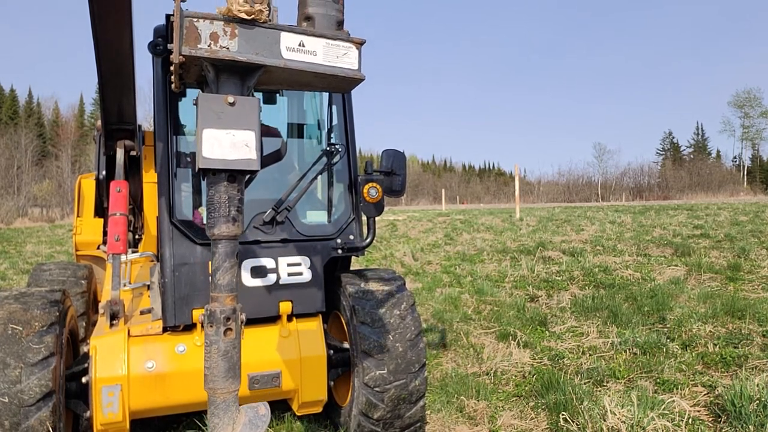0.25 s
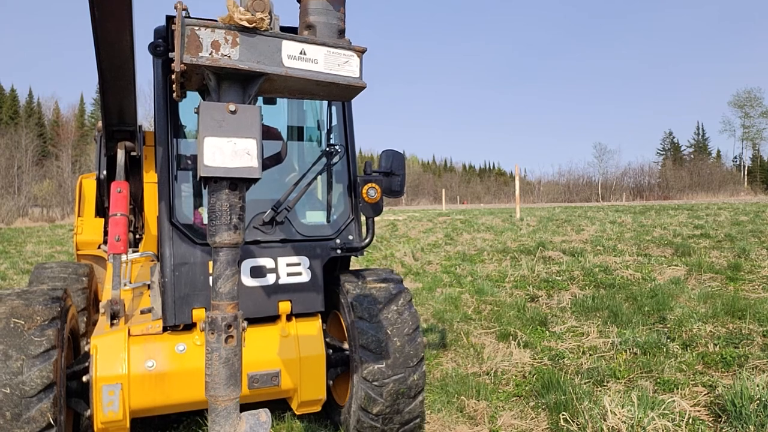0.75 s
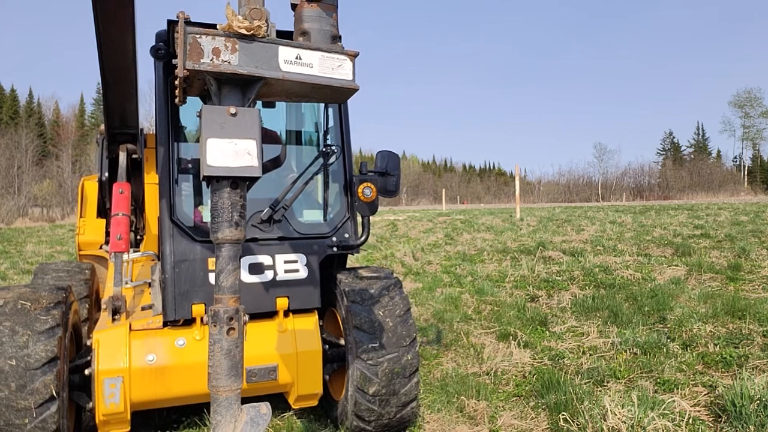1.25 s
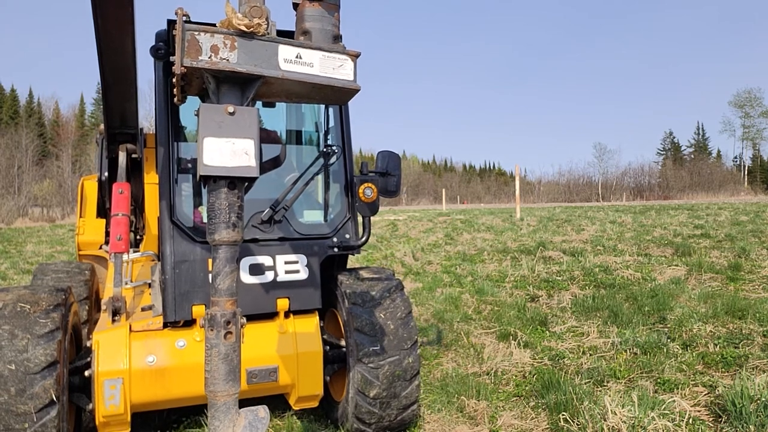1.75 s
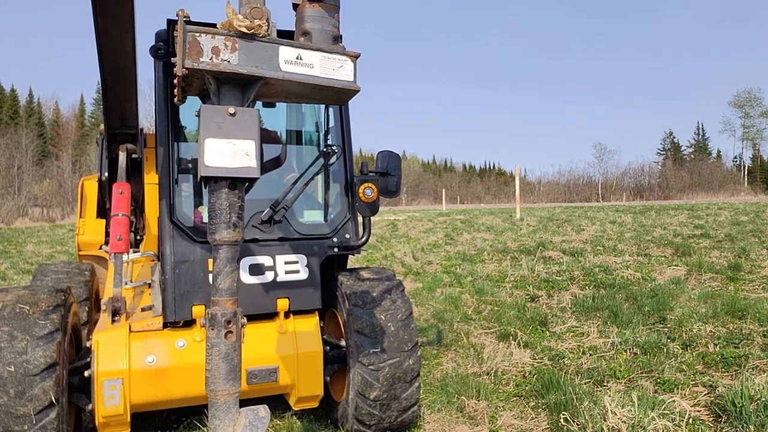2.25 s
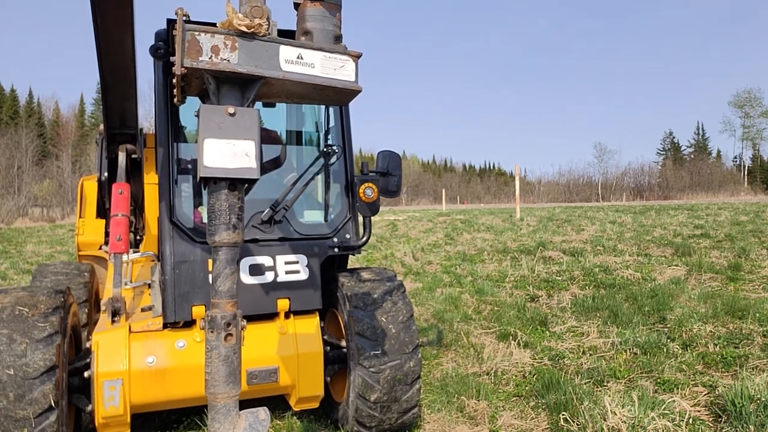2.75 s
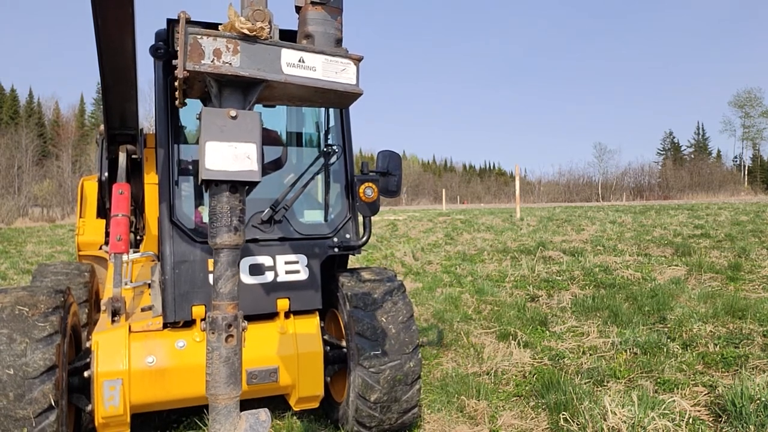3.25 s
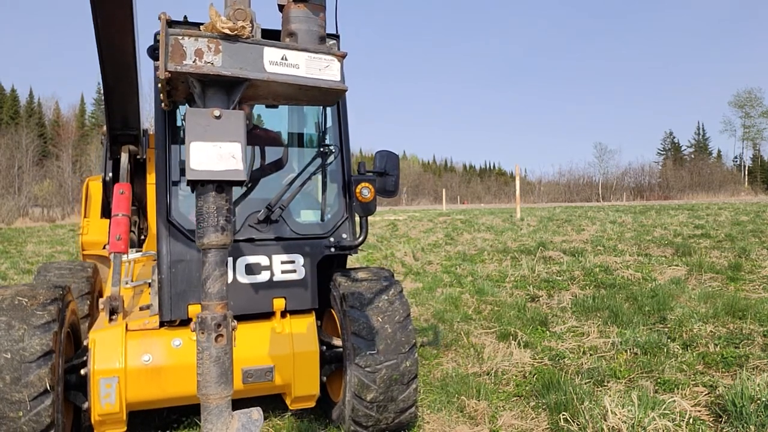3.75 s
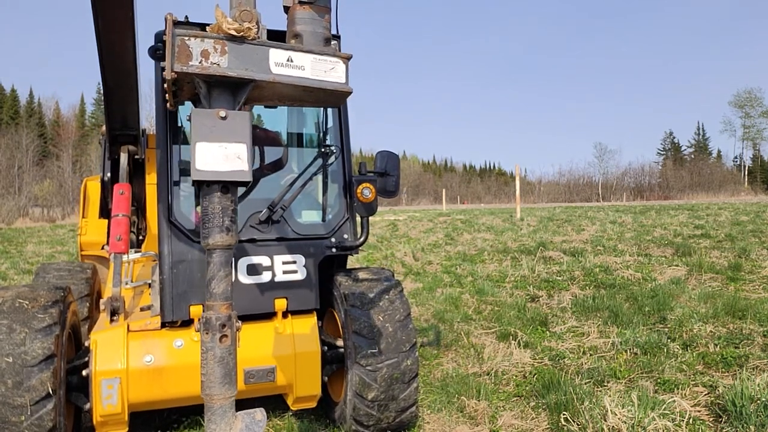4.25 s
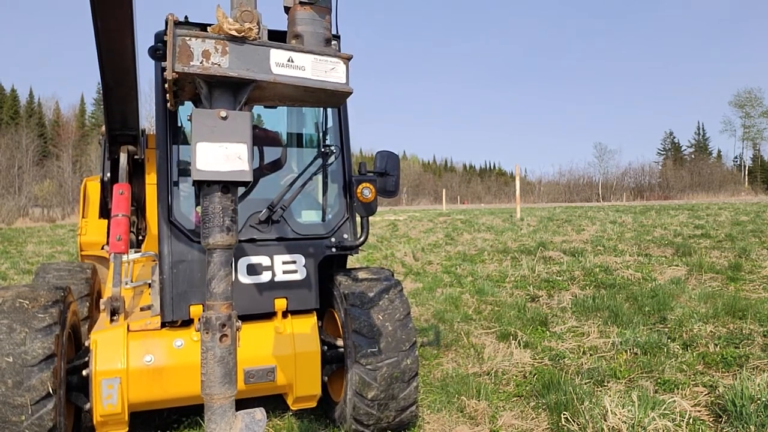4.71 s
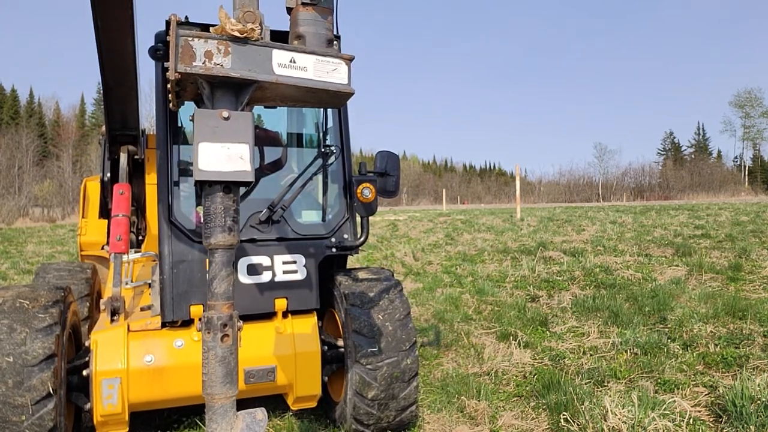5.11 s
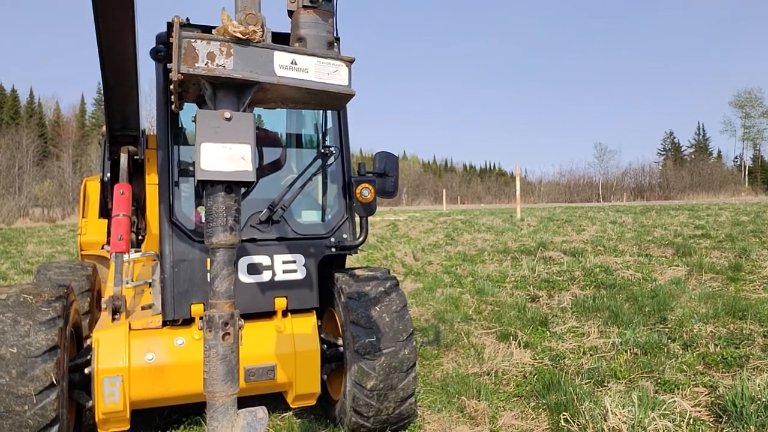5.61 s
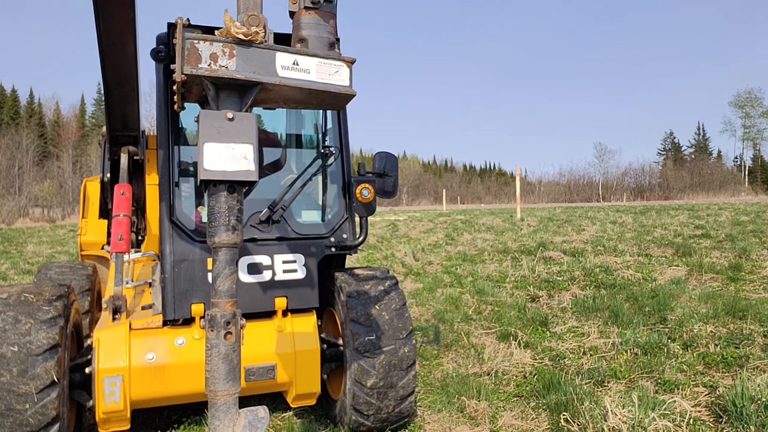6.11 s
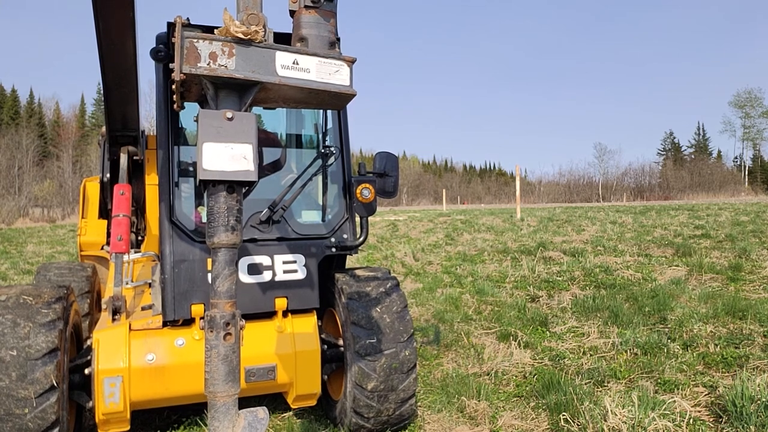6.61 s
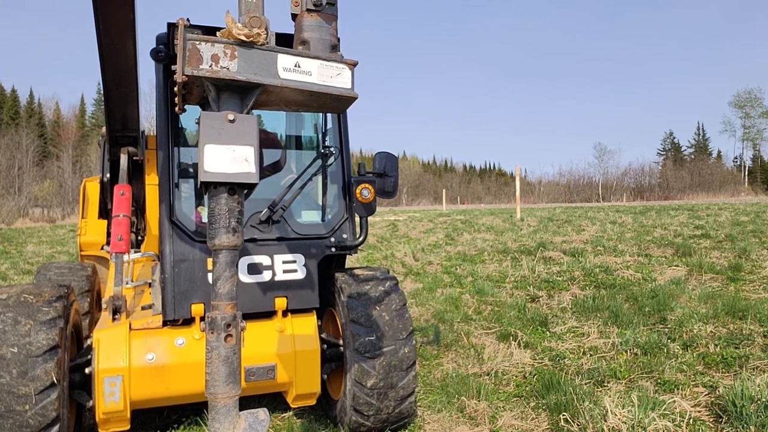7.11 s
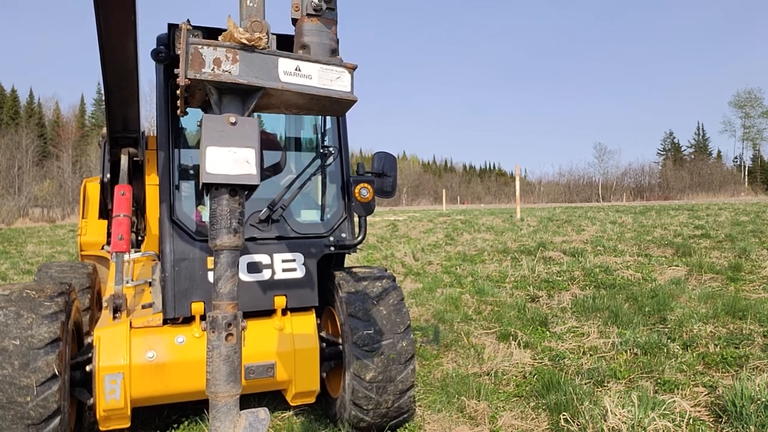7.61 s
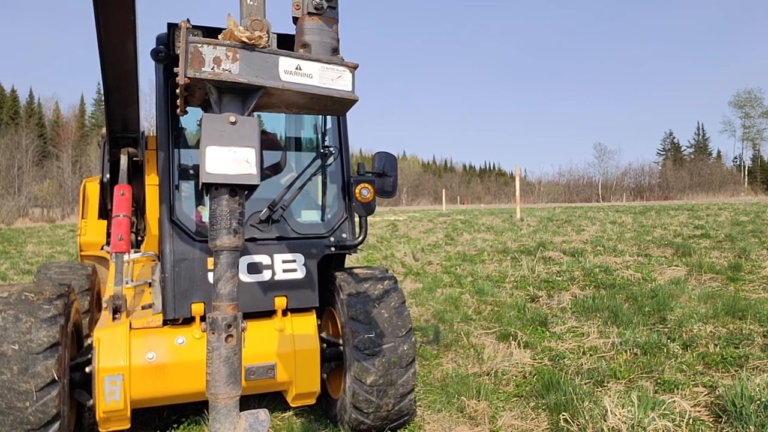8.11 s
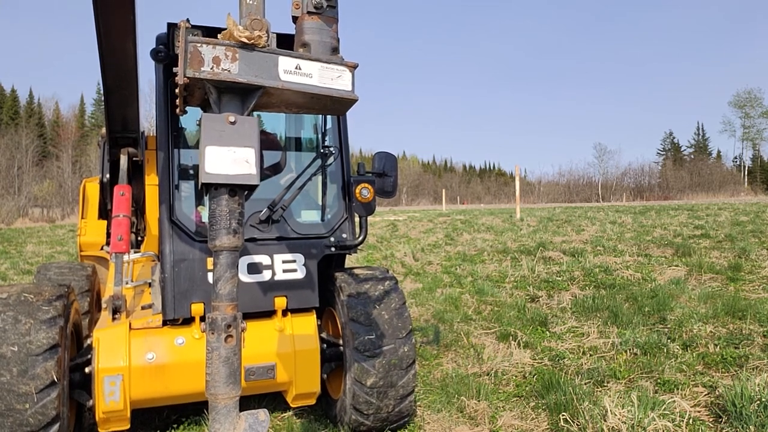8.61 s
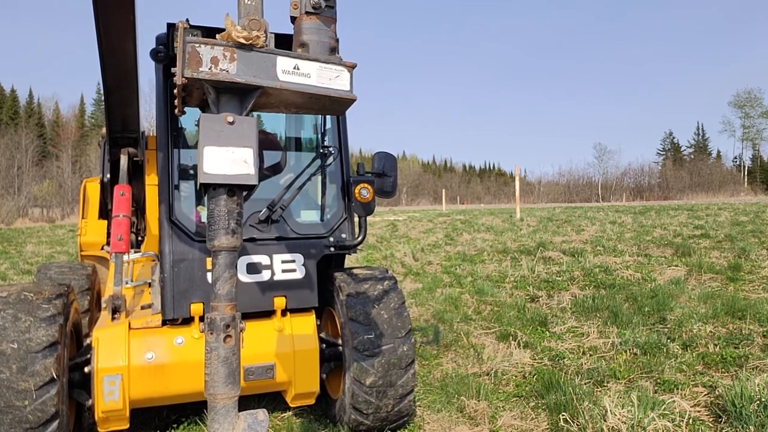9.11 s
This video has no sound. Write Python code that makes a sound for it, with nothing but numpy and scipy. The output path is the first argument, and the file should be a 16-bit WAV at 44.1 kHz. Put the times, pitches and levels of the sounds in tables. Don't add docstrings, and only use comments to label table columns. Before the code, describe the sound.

Steady diesel machinery heard close outdoors: throbbing low hum, rough rattle, metallic tapping each engine cycle and irregular bright ticks. Early on the slack auger coupling clanks hard twice, bright then short, with oil rushing through a valve. Afterwards the engine keeps going with tiny speed wavers and changing hydraulic whine. Soft wind rumble comes and goes on the two microphone ports; dry open space, faint ground reflections.

```python
import sys
import numpy as np
from scipy import signal
from scipy.fft import rfft, irfft, next_fast_len
from scipy.io import wavfile

SR = 44100
rng = np.random.default_rng(int(sys.argv[2]) if len(sys.argv) > 2 else 0)


def makeup_ratio(level_db):
    decades = np.asarray(level_db, float) / 20
    return 10 ** decades


def master(y):
    cut = np.clip(np.atleast_2d(y).T, -1, 1)
    pcm = np.round(cut * 32767)
    wavfile.write(sys.argv[1], SR, pcm.astype(np.int16))


N = 412776

# t/s, length/s, level/dB
GUSTS = [(-.1, .15, 28), (.45, 0.77, 13), (1.3, 0.13, 21), (1.7, 0.17, 14), (2.3, 0.53, 13), (2.8, .45, 13),
         (4.2, 0.46, -6), (4.65, .15, 11), (5, .3, 13), (5.6, 0.13, 9), (5.95, 0.16, 14), (7, .3, 10),
         (8.1, 1.3, -15)]
BREEZE_DB, GUST_RAMP_S = -33.5, 0.21

# t/s, peak/dB, low part/dB, middle part/dB, upper part/dB, t60/s
CLANKS = [
    (0.787, -11, -2.5, -13, -2.5, 0.058),
    (1.1982, -31, -2, -12, -2, 0.058),
    (1.225, -33, 3, 6, 7, 0.08),
    (1.3886, -9.5, -12, -11, -16, 0.037),
    (2.8694, -32, 2.5, -4, -2, 0.045),
    (5.863, -32.5, 0, -13, -1, 0.065),
]
# f/Hz, width/Hz, level/dB
COUPLING_MODES = [(724, 35, -4.5), (1243, 83, 1.5), (1620, 30, -7), (1737, 37, 1), (6800, 70, -3),
                  (7570, 380, -7.5), (11300, 100, -8)]
# f/Hz, level/dB
CRACK = [(500, -9), (800, -3), (1500, 0.5), (2300, -6), (3700, -3), (4800, 0.5), (6900, -4.5), (8600, -9.5),
         (11600, 0), (16000, -15)]
AUGER_LEAD_SAMPLES = 3

# t/s, f/Hz
FAN = [(0, 436), (1.2, 439.5), (2.45, 431), (3.2, 431.5), (3.8, 438.5), (5.4, 440.5), (8.5, 436),
       (9.36, 438)]
FAN_DB, FAN_DB_PER_HZ, FAN_HZ = -39.5, 0.33, 439.6
# order/cycle, level/dB, waver/dB
GEARS = [(28.2, -42, 1.5), (60, -58, 2), (64, -57, 2), (66, -54, 4), (68, -54, 3), (90, -60, 2),
         (92, -56, 1), (124, -56, 1), (128, -54, 1)]
GEAR_CYCLE = .225

VALVE_RAMP_S = 0.095
# t/s, level/dB
PRESSURE = [(0, -40.5), (.6, -49), (1.28, -41.5), (1.67, -41), (3.18, -48), (3.73, -42), (4.3, -42.5),
            (5.19, -42.5), (5.5, -39), (6.78, -45), (7.4, -38.5), (8.53, -44), (9.25, -41.5), (9.36, -41)]
# t/s, length/s, level/dB
LIFTS = [(-.1, 1.23, 12.5), (3.6, 0.71, 11), (4.9, 0.72, 0), (6.85, 0.43, 11), (7.7, .65, 7),
         (9.1, 0.16, 1)]
# t/s, length/s, level/dB
TILTS = [(.7, 0.26, 14), (1.6, 0.25, 6), (3.6, 0.51, 6), (5.3, 0.61, 14), (6.9, 0.68, 12.5),
         (8.9, .6, 11.5)]
SECOND_DB, FOURTH_DB = -51, -58
# t/s, length/s, level/dB
OIL_HISS = [
    (-.1, 1.24, 4),
    (2.7, 0.43, 2),
    (6.9, 0.7, 1.5),
]

# f/Hz, density/(dB per Hz)
CLATTER = [(45, 1), (110, 12.5), (190, 3.5), (280, 3), (400, 0.5), (480, 1.5), (700, -3), (1200, -4.5),
           (1900, -6), (2700, -13.5), (5000, -16), (7700, -21.5), (11000, -27), (15000, -28.5)]
# f/Hz, swell per firing/dB, share repeated each cycle/1, left-right likeness/1
GRAIN = [(40, -8, 0.13, 0.56), (200, 4.5, 0, 0.84), (800, -1.5, 0.35, 1), (1550, 0.5, 0.6, 0.76),
         (3230, 2, 0.3, 0.79), (5200, 6, 0.15, 0.4), (12000, 6.5, 0, 0.5)]
CLATTER_DB, PANEL_DB, INJECTOR_DB, HISS_DB = -34.5, -48, -48.5, 1

# moment/cycle, f/Hz, width/Hz, peak/dB
TAPS = [(.06, 1750, 80, -39), (.29, 1430, 60, -36), (.33, 1850, 50, -36), (.37, 1360, 35, -34),
        (.58, 1850, 80, -37), (.63, 1310, 50, -34), (.76, 1840, 70, -37), (.815, 1610, 80, -31),
        (.89, 1340, 40, -35)]
# t/s, peak/dB
TICKS = [(0.41, -28), (0.6006, -24), (0.7871, -24), (1.1987, -26), (1.274, -23), (1.3874, -24),
         (1.8595, -32), (2.0448, -27.5), (2.1186, -29), (2.162, -28), (2.2124, -24), (2.681, -29),
         (2.7252, -25), (2.8694, -26), (3.101, -23.5), (3.2445, -24.5), (4.1609, -27), (4.6758, -25),
         (4.8164, -26), (4.8434, -27), (5.218, -24), (5.335, -25), (5.8641, -26.5), (7.3083, -31),
         (8.1, -27), (8.525, -25.5), (8.972, -22.5)]
TICK_DB, TICK_SPREAD_DB, TICK_PHASE = -40, 5.5, 0.204
# block/dB, panel/dB, covers/dB
CYLINDER_DB = [(0, -3, -2), (0, 4, 5), (1.5, -1, 1), (1, 3, 1)]
# f/Hz, width/Hz, level/dB
PANEL = [(1265, 50, -8), (1322, 30, -2), (1362, 25, 1), (1440, 50, -8)]
# f/Hz, width/Hz, level/dB
COVERS = [(980, 25, -19), (1545, 35, -4), (1630, 60, -10), (1840, 36, 1), (2200, 45, -6), (4180, 60, -16)]
# f/Hz, width/Hz, level/dB
INJECTOR = [(4560, 150, -9), (4760, 80, 2), (4950, 200, -6), (5220, 200, -7)]
# f/Hz, width/Hz, level/dB
TURBO = [(15180, 40, 0), (15530, 80, 1)]
# t/s, length/s, level/dB
PANEL_HELD = [(-.1, 1.3, -9), (1.5, .3, -10), (3.6, 0.3, -5), (7, 0.28, -11)]
# t/s, length/s, level/dB
ROUGH_SPELLS = [
    (1.25, .2, 4.5),
    (2.1, 1.25, 2.5),
    (4, 0.73, 1.5),
    (4.95, 0.17, -9),
    (8.4, 0.17, -3),
]

# t/s, rate/(cycles per s)
SPEED = [(0.0, 10.446), (0.69, 10.455), (0.89, 10.282), (1.3, 10.755), (1.62, 10.485), (2.03, 10.726),
         (2.62, 10.638), (3.41, 10.647), (3.76, 10.427), (4.03, 10.881), (4.18, 10.663), (5.47, 10.614),
         (6.38, 10.734), (7.16, 10.547), (7.55, 10.77), (8.6, 10.597), (8.82, 10.638), (9.36, 10.575)]
START_CYCLE, RUNNING_SPEED_HZ = .023, 10.63
# t/s, level/dB
LOAD = [(0, -20.5), (.2, -21.5), (1, -23), (1.25, -20.5), (1.9, -21), (2.15, -21), (2.45, -21.5),
        (3.1, -21), (3.4, -19), (3.85, -22), (4.15, -19), (5, -23), (5.4, -20.5), (7.7, -20), (8.1, -20.5),
        (8.65, -23), (9, -24), (9.36, -21)]
# order/cycle, level/dB
EXHAUST = [(5, -30), (6, -30), (7, -25), (9, -33), (10, -27), (11, -13), (12, 0), (13, -11), (14, -33),
           (15, -12), (16, -14), (17, -20), (19, -22)]
MUFFLER_ORDER, MUFFLER_LAG_TURNS = 14, .26
# t/s, length/s, level/dB
HUM_FADES = [(-.1, 0.47, -3), (.85, 0.47, -3.5)]
HUM_DB = -24
# order/cycle, level/dB
AIR_BOX = [(20, -33.5), (21, -23.5), (22, -82), (23, -11.5), (24, -11.5), (25, -1), (26, -23.5), (27, -23),
           (30, -27.5), (32, -26), (33, -14.5), (47, -41), (51, -34)]
THUMP_CYCLE, THUMP_LEAD_TURNS = .55, .29
BOX_DB, BOX_DB_PER_HZ = -32.5, -9

# f/Hz, colour/dB, left minus right/dB
PORTS = [(20, -2, -10), (31, -12, -2), (39, -1, -2), (200, 1, -2), (1330, 1, -2.5), (4800, -1.5, -4),
         (6300, -2, -0.5), (7910, 3.5, -7.5), (8730, -11, 3.5), (9650, -9.5, 8), (10150, -3.5, 0.5),
         (15540, -3.5, .5), (15830, -42, 0)]
LEFT_LAG_SAMPLES = 8


def rms_one(x):
    return x / np.sqrt(np.mean(x ** 2) + 1e-20)


def in_time(rows):
    s, *columns = np.transpose(rows)
    return [np.interp(np.arange(N) / SR, s, c) for c in columns]


def at_hz(rows, hz):
    f, *columns = np.transpose(rows)
    return [np.interp(np.log(hz), np.log(f), c) for c in columns]


def spells(rows, ramp_s):
    t = np.arange(N) / SR
    total_db = 0
    for s, length_s, db in rows:
        inside_s = np.minimum(t - s, s + length_s - t)
        total_db = total_db + db * np.clip(inside_s / ramp_s + .5, 0, 1)
    return total_db


def drift(rate_hz):
    r = np.exp(-80 * np.pi * rate_hz / SR)
    slow = signal.lfilter([1], [1, -2 * r, r * r], rng.standard_normal(N // 40 + 2002))[2000:]
    return np.interp(np.arange(N) / 40, np.arange(len(slow)), rms_one(slow))


def band(x, low_hz, high_hz):
    sos = signal.butter(2, [low_hz, high_hz], "band", fs=SR, output="sos")
    return signal.sosfilt(sos, x + 1e-18)


def resonances(x, modes):
    out = 0
    for k, (hz, width_hz, db) in enumerate(modes):
        r = np.exp(-np.pi * width_hz / SR)
        a = [1, -2 * r * np.cos(2 * np.pi * hz / SR), r * r]
        gain = (-1) ** k * makeup_ratio(db) * (1 - r * r) / 2
        out = out + gain * signal.lfilter([1, 0, -1], a, x + 1e-18)
    return out


def tone(turns, db, wobble_db):
    return np.sqrt(2) * makeup_ratio(db + wobble_db * drift(1.28)) * np.cos(2 * np.pi * turns)


def bursts(rows, t60s):
    out = np.zeros(N)
    for (s, db), t60 in zip(rows, t60s):
        at = round(s * SR)
        age_s = np.arange(min(N - at, round(t60 * SR))) / SR
        out[at:at + len(age_s)] += makeup_ratio(db - 60 * age_s / t60) * np.minimum(age_s / 0.00013, 1)
    return out * rng.standard_normal(N)


def wind():
    gusts = np.array([makeup_ratio(1.2 * drift(4.0)) * band(rng.standard_normal(N), 23, 71) for side in range(2)])
    return makeup_ratio(BREEZE_DB + spells(GUSTS, GUST_RAMP_S) - 9.5) * rms_one(gusts)


def ground(x):
    dull = band(x, 420, 13500)
    lags = [round(s * SR) for s in (.0041, .0063)]
    return np.array([x + makeup_ratio(-13) * np.r_[np.zeros(lag), dull[:-lag]] for lag in lags])


def clanks():
    s, peak_db, low_db, middle_db, upper_db, t60 = np.transpose(CLANKS)
    top = bursts(zip(s, peak_db), t60) + bursts(zip(s, peak_db - 12), 2.2 * t60)
    upper = bursts(zip(s, peak_db + upper_db + 3), 1.6 * t60)
    middle = bursts(zip(s, peak_db + middle_db + 8), 1.6 * t60)
    low = bursts(zip(s + .001, peak_db + low_db + 6), 2.3 * t60)
    out = 0
    edges_hz = 500 * 2 ** np.arange(0, 5.1, .5)
    for a, b in zip(edges_hz, edges_hz[1:]):
        blow = low if b < 2100 else middle if b < 4100 else upper if b < 5700 else top
        crack_db, = at_hz(CRACK, np.sqrt(a * b))
        out = out + makeup_ratio(crack_db + 5) * band(blow, a, b)
    out = out + makeup_ratio(9.5) * resonances(top, COUPLING_MODES[4:])
    return out + makeup_ratio(8.0) * resonances(low, COUPLING_MODES[:4])


def fan():
    blade_hz, = in_time(FAN)
    blade_db = FAN_DB + FAN_DB_PER_HZ * (blade_hz - FAN_HZ)
    return tone(np.cumsum(blade_hz + 0.865 * drift(3.1)) / SR, blade_db, wobble_db=0.8)


def gears(cycle):
    return sum(tone(order * (cycle - GEAR_CYCLE), db, waver_db) for order, db, waver_db in GEARS)


def pump(cycle):
    strokes = 18 * cycle
    second_db = SECOND_DB + spells(LIFTS, VALVE_RAMP_S)
    third_db, = in_time(PRESSURE)
    fourth_db = FOURTH_DB + spells(TILTS, VALVE_RAMP_S)
    levels_db = second_db, third_db, fourth_db
    return sum(tone(k * strokes, db, wobble_db=1.0) for k, db in enumerate(levels_db, 2))


def contacts(cycle):
    size = 4096
    loop = rng.standard_normal(size) * makeup_ratio(2 * rng.standard_normal(size // 32).repeat(32))
    return rms_one(np.interp(cycle % 1 * size, np.arange(size), loop))


def clatter(cycle, swell, hiss_db):
    white = rng.standard_normal((2, 2, N))
    again = contacts(cycle)
    out = 0
    edges_hz = 22 * 2 ** np.arange(0, 9.7, .4)
    for k, (low, high) in enumerate(zip(edges_hz, edges_hz[1:])):
        hz = np.sqrt(low * high)
        swell_db, share, alike = at_hz(GRAIN, hz)
        share, alike = np.clip(share, 0, 1), np.clip(alike, 0, 1)
        fresh, side = white[k % 2]
        mid = np.sqrt(1 - share) * fresh + np.sqrt(share) * again
        mid, side = band(np.array([mid, side]), low, high)
        level_db = at_hz(CLATTER, hz)[0] + swell_db * (swell - .5) + 0.45 * drift(4.7)
        gain = makeup_ratio(level_db + hiss_db * (hz > 8000))
        out = out + gain * (np.sqrt(1 + alike) * mid + np.sqrt(1 - alike) * side * [[1], [-1]])
    return out / np.sqrt(np.mean(band(out, 360, 18000) ** 2))


def tappet(cycle):
    out = 0
    force = makeup_ratio(.8 * drift(8.0))
    for moment, hz, width_hz, db in TAPS:
        taps = force * np.diff(np.floor(cycle - moment), prepend=-1)
        out = out + SR / (2 * np.pi * width_hz) * resonances(taps, [(hz, width_hz, db)])
    return out


def ticks(cycle, rough_db):
    at = np.flatnonzero(np.diff(np.floor(4 * cycle - TICK_PHASE)))
    chance = np.clip(rng.standard_normal(len(at)), -2, 1.3)
    faint_db = TICK_DB + rough_db[at] + TICK_SPREAD_DB * chance
    faint = bursts(zip(at / SR, faint_db), np.full(len(at), .028))
    hard = bursts(TICKS, np.full(len(TICKS), .03))
    edge = makeup_ratio(-5.5) * band(hard, 5000, 7400) + makeup_ratio(-0.5) * band(hard, 2400, 7100)
    return makeup_ratio(15.0) * resonances(hard + faint, INJECTOR) + edge


def ringing_parts(swell, blows, hits_db, panel_db, injector_db):
    knock = rng.standard_normal(N) * makeup_ratio(6 * swell) + 75 * blows
    panel = resonances(knock * makeup_ratio(hits_db[1]), PANEL)
    covers = resonances(knock * makeup_ratio(1.4 * hits_db[2]), COVERS)
    jolt = rng.standard_normal(N) * makeup_ratio(9.3 * swell + 1.9 * drift(2.8))
    injector = resonances(jolt, INJECTOR)
    turbo = resonances(rng.standard_normal(N) * makeup_ratio(3.0 * drift(1.2)), TURBO)
    return (makeup_ratio(panel_db + 1.0) * rms_one(panel) + makeup_ratio(CLATTER_DB - 9.5) * rms_one(covers)
            + makeup_ratio(injector_db - 1.0) * rms_one(injector) + makeup_ratio(-68) * rms_one(turbo))


def firing_swell(cycle):
    firing = 4 * cycle + .08
    stroke, count = firing % 1, firing.astype(int)
    shape = np.minimum(stroke / .28, (1 - stroke) / .72)
    strength = np.clip(1 + 0.18 * rng.standard_normal(count[-1] + 1), .1, 3)[count]
    blows = strength * np.diff(np.floor(firing - .2), prepend=-1)
    hits_db = np.sqrt(shape) * np.array(CYLINDER_DB)[count % 4].T
    return shape * strength, blows, hits_db


def exhaust(cycle, speed_hz):
    boom_db, = in_time(LOAD)
    hum_db = HUM_DB + spells(HUM_FADES, VALVE_RAMP_S)
    box_db = BOX_DB + BOX_DB_PER_HZ * (speed_hz - RUNNING_SPEED_HZ)
    out = tone(8 * cycle + .03, hum_db, wobble_db=.3)
    out += tone(4 * cycle + .08, -38, wobble_db=.6)
    for order, db in EXHAUST:
        lag_turns = MUFFLER_LAG_TURNS * (order > MUFFLER_ORDER)
        out += tone(order * cycle - lag_turns, boom_db + db - .9, wobble_db=0.6)
    for order, db in AIR_BOX:
        out += tone(order * (cycle - THUMP_CYCLE) + THUMP_LEAD_TURNS, box_db + db, wobble_db=0.87)
    return out


def scene():
    speed_hz, = in_time(SPEED)
    cycle = START_CYCLE + np.cumsum(speed_hz) / SR
    swell, blows, hits_db = firing_swell(cycle)

    held_db = spells(PANEL_HELD, VALVE_RAMP_S)
    rough_db = spells(ROUGH_SPELLS, VALVE_RAMP_S)
    parts = ringing_parts(swell, blows, hits_db, PANEL_DB + held_db, INJECTOR_DB + rough_db)
    parts = parts + ticks(cycle, rough_db) + makeup_ratio(held_db) * tappet(cycle)

    left, right = ground(clanks())
    auger = np.array([np.roll(left, -AUGER_LEAD_SAMPLES), right])
    hiss_db = HISS_DB + spells(OIL_HISS, VALVE_RAMP_S)
    noise = makeup_ratio(CLATTER_DB) * clatter(cycle, swell + hits_db[0] / 6, hiss_db)
    tones = exhaust(cycle, speed_hz) + pump(cycle) + gears(cycle) + fan()
    return wind() + auger + tones + noise + ground(parts)


def band_limit(x):
    return signal.sosfilt(signal.butter(12, 15850, fs=SR, output="sos"), x)


def record(dry):
    size = next_fast_len(N + 2048)
    hz = np.maximum(np.arange(size // 2 + 1) * SR / size, 1)
    colour_db, tilt_db = at_hz(PORTS, hz)
    late = np.exp(-2j * np.pi * hz * LEFT_LAG_SAMPLES / SR)
    response = makeup_ratio(colour_db) * np.array([makeup_ratio(tilt_db / 2) * late, makeup_ratio(-tilt_db / 2)])
    mix = irfft(rfft(dry, size) * response, size)[:, :N]
    return band_limit(mix)


dry = scene()
out = record(dry)
master(out)
```